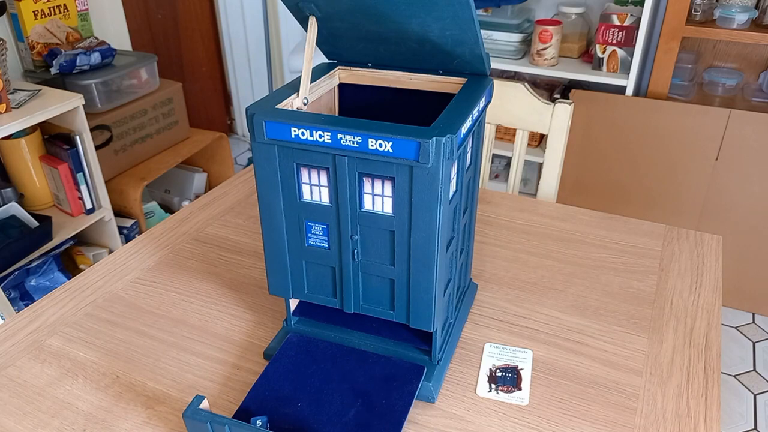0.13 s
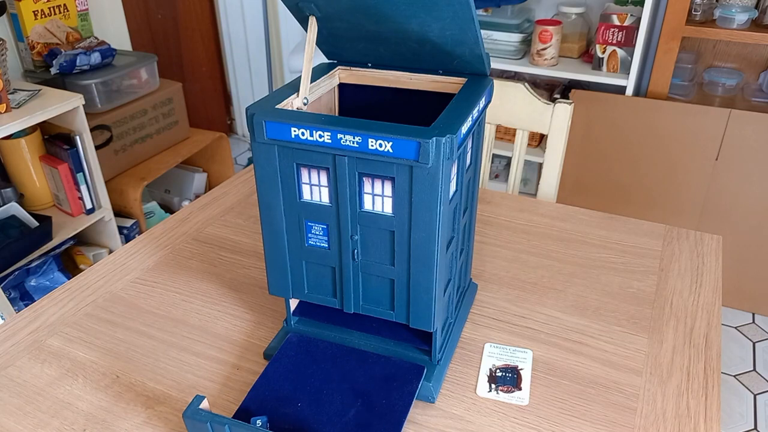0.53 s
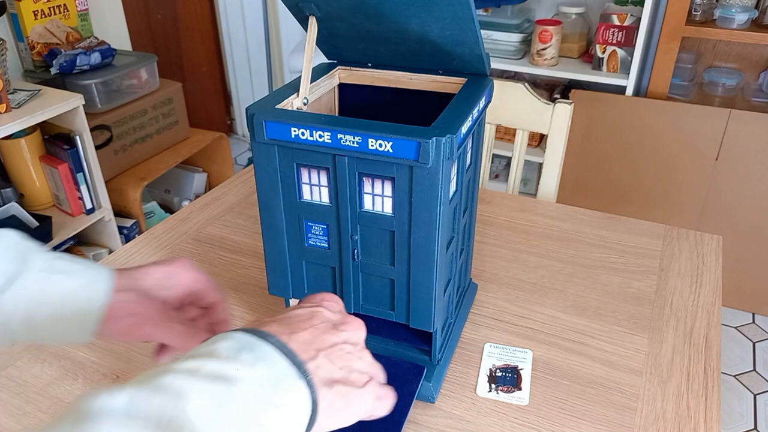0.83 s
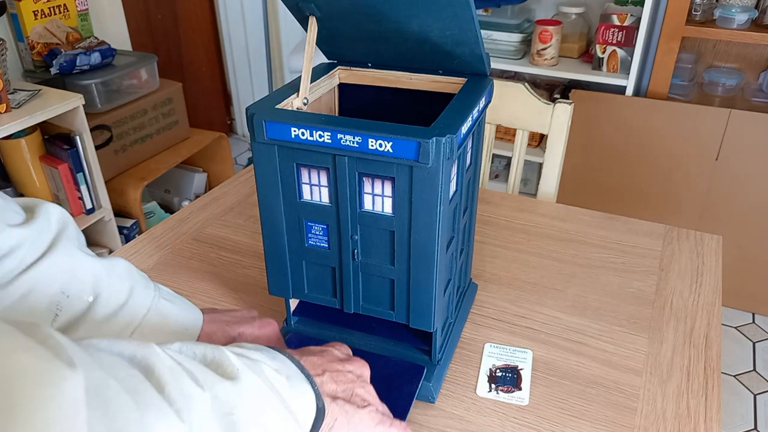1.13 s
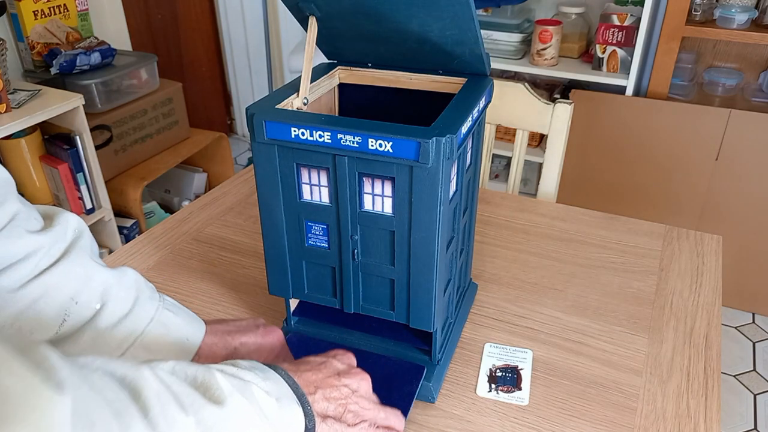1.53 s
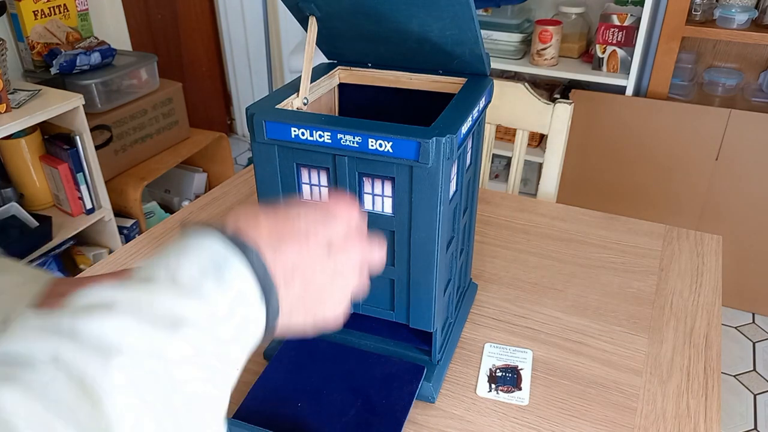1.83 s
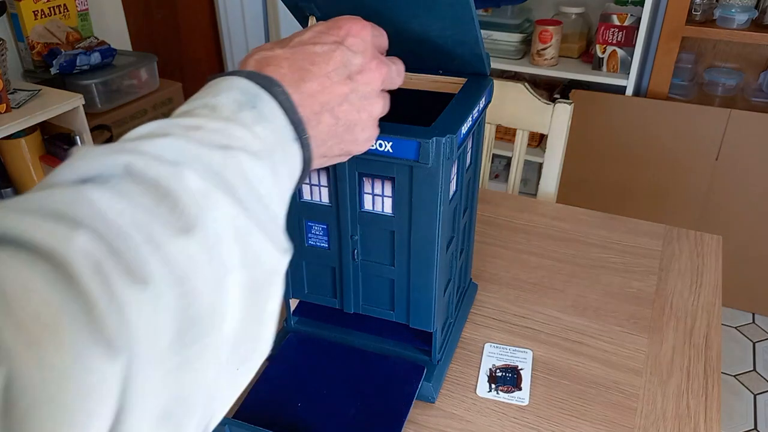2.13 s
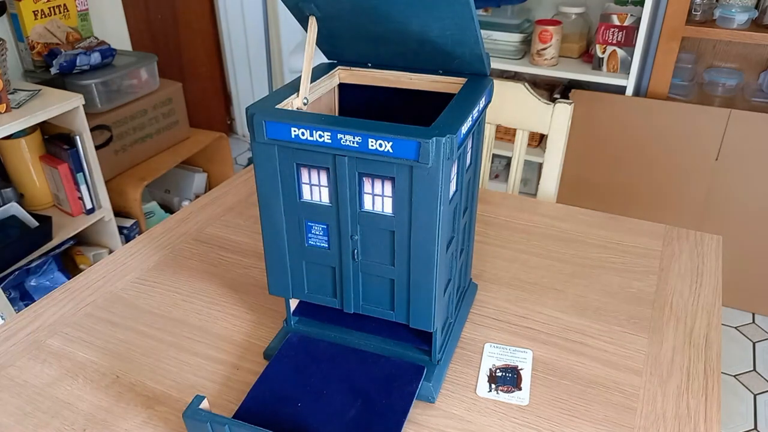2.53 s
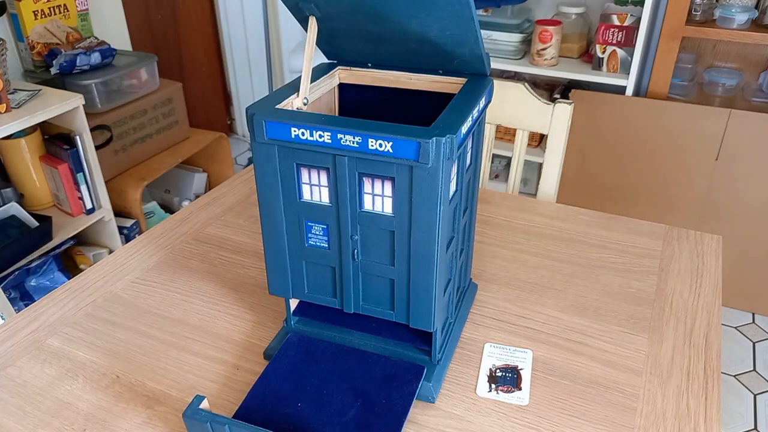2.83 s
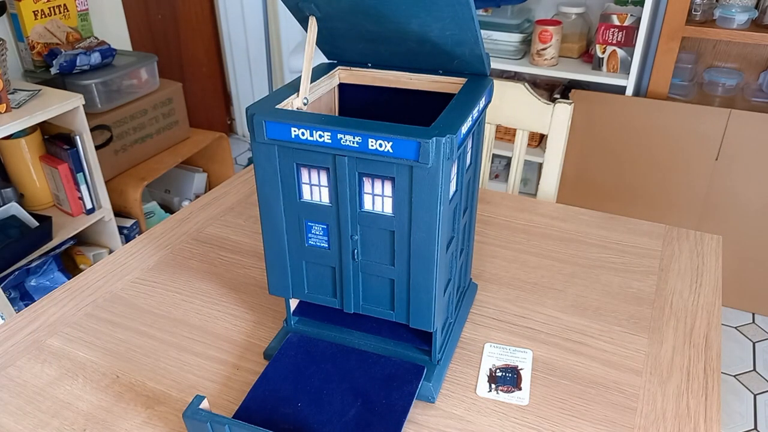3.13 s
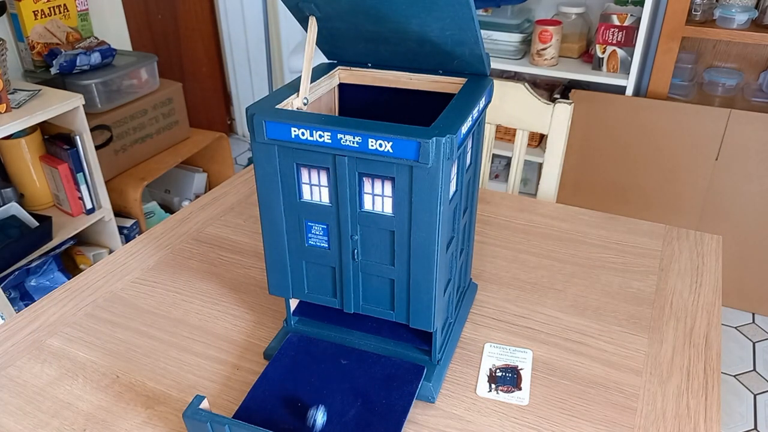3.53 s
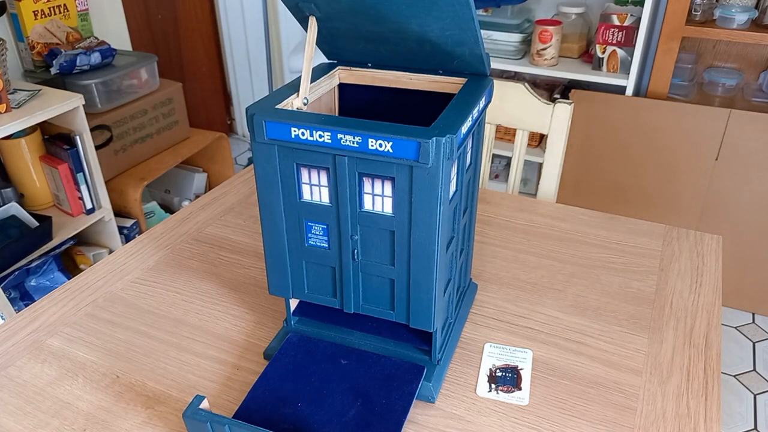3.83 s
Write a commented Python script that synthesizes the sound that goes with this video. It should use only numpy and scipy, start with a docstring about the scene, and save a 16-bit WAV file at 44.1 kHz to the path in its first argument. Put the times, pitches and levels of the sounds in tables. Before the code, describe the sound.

A die clatters down a wooden dice tower and lands softly on a felt tray.

```python
"""A quiet room hisses, with faint far-off whistles, low hoots and the rustle of a sleeve.
After about two seconds a die drops into a wooden dice tower on a table. It knocks and rattles on the
top baffle, a side wall, the middle baffle and the ramp, rolls over the sill and bounces softly on a
felt-lined tray. Each blow makes a short clack and rings the modes of the board it strikes;
the table thumps faintly and the small room reverberates."""
import sys
import numpy as np
from scipy import signal
from scipy.fft import rfft, irfft
from scipy.io import wavfile

SR = 44100
rng = np.random.default_rng(int(sys.argv[2]) if len(sys.argv) > 2 else 0)


def waveform_to_disk(signal):
    """Save audio, clipped to [-1, 1], as 16-bit WAV at the path in sys.argv[1]."""
    frames = np.transpose(np.atleast_2d(signal))
    scaled = np.clip(frames, -1, 1) * 32767
    samples = np.round(scaled).astype(np.int16)
    wavfile.write(sys.argv[1], SR, samples)


N = 176400
TIME = np.arange(N) / SR

# Background spectrum: freq_hz, relative_density_db
HISS_SPECTRUM = [(15, -44.5), (25, -25), (64, 2.5), (206, -8.5), (293, -8.5), (416, -15), (624, -14.5),
                 (1700, -12), (2050, -13), (3160, -0.5), (4400, -8), (5000, -20.5), (16000, -40.5)]
# Background drift: time_s, level_db (before HISS_TRIM_DB)
HISS_DRIFT = [(0.0, -63.5), (2.87, -64), (4.0, -62.5)]
# Far whistles: start_s, release_s, level_db, first_hz, final_hz, blur_hz
WHISTLES = [(-.1, .2, -64, 2900, 2897, 9.2), (.63, 0.854, -69, 5700, 5465, 73),
            (1.12, 1.3, -70, 4260, 4220, 17), (1.41, 1.52, -66, 4150, 2950, 90),
            (1.75, 1.86, -70.5, 4750, 4050, 80)]
# Low hoots: start_s, end_s, level_db, first_hz, last_hz
HOOTS = [(0.107, 0.457, -78.5, 349, 355), (0.958, 1.446, -74.5, 316, 347.6)]
# Friction of the sleeve, and of the die on a baffle: start_s, end_s, level_db, centre_hz, half_width_oct
SLEEVE_RUSTLES = [(-.15, 0.466, -66.5, 4560, 0.13), (-.15, 0.926, -68.5, 2060, 0.17),
                  (0.58, 1.29, -67, 3650, 0.088), (0.683, 1.05, -76, 10200, 0.29),
                  (1.21, 1.602, -73, 6300, 0.1), (1.672, 2.49, -62, 4160, 0.26),
                  (1.852, 2.49, -58, 6150, 0.062)]
DIE_SLIDE = (2.95, 3.22, -53, 3400, 1.05)
# Left-right likeness: freq_hz, correlation
AIR_CORRELATION = [(60, 0.27), (500, .5), (2000, 0.067), (8000, 0.035)]
ROOM_CORRELATION = [(200, 1), (600, 0.38), (1500, 0.27), (5000, 0.24)]
CLACK_CORRELATION = [(100, 0.13), (500, .92), (1200, -0.8), (2500, 0.07), (5000, -0.63), (15000, 0.14)]
# Spectra of reverberation and clacks: freq_hz, relative_db
ROOM_SPECTRUM = [(200, -0.5), (800, -5), (2000, -5), (4000, -3.5), (8000, -3.5), (15000, -3.5)]
WOOD_CLACK = [(250, -21), (650, -1.5), (1200, -6), (2200, -6.5), (3500, -16), (5500, -26.5), (9000, -27),
              (15000, -27)]
FELT_CLACK = [(250, -5.5), (700, 2.5), (1300, 0), (2200, -9), (15000, -46.5)]
# Their decay: freq_hz, t60_s
ROOM_DECAY = [(250, 0.44), (800, 0.34), (3000, 0.44), (7000, 0.36), (15000, .44)]
CLACK_DECAY = [(250, 0.09), (1000, 0.056), (2500, 0.046), (6000, 0.033), (15000, 0.045)]
# Modes of the table under the tower: pitch_hz, relative_db, t60_s
TABLE_MODES = [(72, -50, .1), (105, -45, 0.043), (122, -47.5, 0.093)]
# Board modes: pitch_hz, relative_db
MOUTH_MODES = [(253, -26.5), (392, -14.5), (1170, -30), (1245, -28.5)]
TOP_MODES = [(261, -13.5), (346, -17), (438, -17.5), (483, -21.5), (647, -24), (722, -12.5), (763, -26),
             (827, -13), (868, -38.5), (1050, -26), (1740, -29), (1772, -26.5), (2818, -35), (3480, -23.5)]
WALL_MODES = [(262, -22.5), (344, -19), (390, -22.5), (440, -22.5), (645, -22), (680, -24.5), (722, -22),
              (760, -19.5), (857, -24.5), (1771, -26), (2228, -20), (2270, -23.5), (2350, -32), (4100, -36)]
MIDDLE_MODES = [(257, -21.5), (311, -21), (480, -25), (511, -16.5), (561, -15), (608, -21), (636, -20.5),
                (1130, -18.5), (1168, -22.5), (1213, -16.5), (1243, -19.5), (1758, -28), (2186, -25.5),
                (2309, -25.5), (2335, -19.5)]
RAMP_MODES = [(262, -12.5), (317, -10), (402, -16.5), (484, -18.5), (510, -14.5), (559, -17), (647, -19.5),
              (676, -24.5), (889, -17), (921, -27.5), (1962, -19.5), (1993, -24), (2121, -25),
              (3007, -20.5)]
SILL_MODES = [(327, -25), (426, -15), (511, -13), (560, -22.5), (885, -17.5), (907, -21.5), (1500, -16),
              (1702, -25)]
TRAY_MODES = [(249, -24), (484, -33.5), (684.5, -19)]
# Blows of the die: start_s, strength_db, contact_cutoff_hz (low for a soft touch)
MOUTH_HITS = [(2.2605, 0, 1523), (2.3405, 0.0095, 558)]
TOP_HITS = [(2.3903, 0.5, 11260), (2.405, -15.5, 1770), (2.416, -10, 5000), (2.426, -6.5, 2024)]
WALL_HITS = [(2.5268, 2.5, 7000), (2.556, -10, 3000), (2.5788, -2.5, 5500), (2.6265, -20.5, 3500),
             (2.654, -23, 3000), (2.6815, -7, 1200), (2.7112, -4.5, 3510), (2.734, -9, 1200)]
MIDDLE_HITS = [(2.773, 2.5, 8670), (2.805, -17.5, 4500), (2.836, -7.5, 2800), (2.8708, -10, 5000)]
RAMP_HITS = [(3.094, -15.5, 490), (3.16, 2.5, 7900)]
SILL_HITS = [(3.314, -16.5, 2500), (3.347, -10.5, 3520), (3.364, -16.5, 1100)]
TRAY_HITS = [(3.4805, -1, 2200), (3.555, -1, 300), (3.608, -11, 220), (3.74, -19.5, 317)]
# Rolls of the die: start_s, end_s, strength_db, contact_cutoff_hz
WALL_ROLLS = [(2.46, 2.76, -22, 750)]
MIDDLE_ROLLS = [(2.79, 2.87, -29, 1392), (2.96, 3.09, -28, 578)]
RAMP_ROLLS = [(3.1, 3.14, -24, 507)]
SILL_ROLLS = [(3.23, 3.35, -21, 914)]

HISS_TRIM_DB = -0.5
MODE_SPREAD_DB, MODE_PAN_DB, LEFT_DB = 4, 1.74, 0.56
TREBLE_DAMPING_HZ = 2200  # joints damp high modes: decay is twice as fast here
# After a light blow the die lingers, damping and detuning the board.
RING_DB_PER_DB, LIGHT_BLOW_DB, DETUNE_RATIO = 0.25, -10, .009


def from_db(db):
    """Decibels to gain."""
    return 10 ** (np.asarray(db) / 20)


def at_hz(points, hz):
    """Table lookup on a log-frequency axis."""
    points_hz, values = np.transpose(points)
    return np.interp(np.log(hz), np.log(points_hz), values)


def butter(x, hz, kind, order=2):
    """Causal Butterworth filter."""
    sos = signal.butter(order, np.clip(hz, 10, .45 * SR), kind, fs=SR, output="sos")
    return signal.sosfilt(sos, x)


def add(out, start_s, sound):
    """Mix a sound in at start_s."""
    i = int(start_s * SR)
    out[:, i:i + sound.shape[1]] += sound[:, :N - i]


def stereo(pair, correlation):
    """Two independent signals to correlated left and right."""
    correlation = np.clip(correlation, -.99, .99)
    mid = np.sqrt((1 + correlation) / 2) * pair[0]
    side = np.sqrt((1 - correlation) / 2) * pair[1]
    return np.array([mid + side, mid - side])


def steady_noise(gain_at):
    """Stereo noise, rms 1, shaped by gain_at(hz)."""
    hz = np.maximum(np.arange(N // 2 + 1) * SR / N, 1)
    white = stereo(rfft(rng.standard_normal((2, N))), at_hz(AIR_CORRELATION, hz))
    noise = irfft(white * gain_at(hz), N)
    return noise / np.std(noise)


def dying_noise(spectrum, decay, correlation, samples):
    """Dense modes as half-octave noise bands, each with its own energy and decay."""
    t, out = TIME[:samples], 0
    edges_hz = np.geomspace(125, 16000, 15)
    for low_hz, high_hz in zip(edges_hz, edges_hz[1:]):
        hz = np.sqrt(low_hz * high_hz)
        burst = rng.standard_normal((2, samples)) * from_db(-60 * t / at_hz(decay, hz))
        band = butter(burst, [low_hz, high_hz], "band")
        band *= np.sqrt(2 * (high_hz - low_hz) / SR / np.sum(band ** 2, axis=1, keepdims=True))
        out += from_db(at_hz(spectrum, hz)) * stereo(band, at_hz(correlation, hz))
    return out


def swell(start_s, end_s, fade_s=.13):
    """Smooth fade in, hold, fade out."""
    ramp = np.clip(np.minimum(TIME - start_s, end_s - TIME) / fade_s, 0, 1)
    return np.sin(np.pi / 2 * ramp) ** 2


def swish(start_s, end_s, level_db, centre_hz, half_width_oct):
    """Friction: a noise band that swells and fades."""
    band = steady_noise(lambda hz: 1 / (1 + (np.log2(hz / centre_hz) / half_width_oct) ** 2))
    return from_db(level_db) * swell(start_s, end_s) * band


def hiss():
    """Room background: faint rumble and hiss."""
    level_db = np.interp(TIME, *np.transpose(HISS_DRIFT)) + HISS_TRIM_DB
    return from_db(level_db) * steady_noise(lambda hz: from_db(at_hz(HISS_SPECTRUM, hz)))


def hoots():
    """Very faint low gliding tones, perhaps a dove outside."""
    out = 0
    for start_s, end_s, level_db, first_hz, last_hz in HOOTS:
        pitch_hz = np.interp(TIME, [start_s, end_s], [first_hz, last_hz])
        out += from_db(level_db) * swell(start_s, end_s) * np.sin(2 * np.pi * np.cumsum(pitch_hz) / SR)
    return out


def whistles(attack_s=.048, slide_s=.05, t60_s=.9):
    """Thin far whistles, perhaps birds: each slides down to its note, holds and dies away."""
    out = 0
    for start_s, release_s, level_db, first_hz, final_hz, blur_hz in WHISTLES:
        age_s = np.maximum(TIME - start_s, 0)
        pitch_hz = final_hz + (first_hz - final_hz) * np.exp(-age_s / slide_s)
        phase = 2 * np.pi * np.cumsum(pitch_hz) / SR
        decay_db = 60 * np.maximum(TIME - release_s, 0) / t60_s
        envelope = np.minimum(age_s / attack_s, 1) * from_db(level_db - decay_db)
        blur = signal.hilbert(steady_noise(lambda hz: 1 / (1 + (hz / blur_hz) ** 2)))
        out += envelope * np.real(blur * np.exp(1j * phase))
    return out


def sleeve():
    """Faint swishes of rubbing cloth."""
    return sum(swish(*rustle) for rustle in SLEEVE_RUSTLES)


def room(x, onset_s=.013):
    """Small-room reverberation, swelling as the first reflections arrive."""
    tail = dying_noise(ROOM_SPECTRUM, ROOM_DECAY, ROOM_CORRELATION, samples=SR * 3 // 4)
    tail *= np.minimum(TIME[:tail.shape[1]] / onset_s, 1) ** 2
    return signal.fftconvolve(x, tail, axes=1)[:, :N]


def table_thumps():
    """Blows on wood excite the table's deep modes."""
    t, out = TIME[:SR // 3], np.zeros((2, N))
    modes = sum(from_db(db - 60 * t / t60_s) * np.sin(2 * np.pi * hz * t)
                for hz, db, t60_s in TABLE_MODES)
    thump = butter(modes, 45, "high")[None]
    for start_s, strength_db, _ in TOP_HITS + WALL_HITS + MIDDLE_HITS + RAMP_HITS + SILL_HITS:
        add(out, start_s, from_db(strength_db) * thump)
    return out


def rolling(rolls, bumps_per_s=100, max_bumps=64):
    """The die bumps over its edges at uneven intervals; returns hits."""
    bumps = []
    for start_s, end_s, strength_db, cutoff_hz in rolls:
        jitter = rng.uniform(-.4, .4, max_bumps)
        times_s = start_s + (np.arange(max_bumps) + jitter) / bumps_per_s
        strengths_db = rng.normal(strength_db, 2, max_bumps)
        bumps += [(s, db, cutoff_hz) for s, db in zip(times_s, strengths_db) if s < end_s]
    return bumps


def board(hits, modes, clack_spectrum, ring_db, clack_db, bass_t60_s):
    """Each blow excites a random mix of modes and a short clack; soft contact dulls both."""
    t, out = TIME[:SR // 3], np.zeros((2, N))
    mode_hz, mode_db = np.transpose(modes)[:, :, None]
    t60_s = bass_t60_s / (1 + mode_hz / TREBLE_DAMPING_HZ)
    envelopes = from_db(mode_db + ring_db - 60 * t / t60_s)
    pan_db = MODE_PAN_DB * rng.standard_normal(len(modes)) * np.array([[1], [-1]])
    clacks = [dying_noise(clack_spectrum, CLACK_DECAY, CLACK_CORRELATION, SR // 8) for _ in range(4)]
    mix, tuning = rng.standard_normal((2, 160, len(modes)))  # up to 160 blows
    for k, (start_s, strength_db, cutoff_hz) in enumerate(hits):
        lightness = np.clip(strength_db / LIGHT_BLOW_DB, 0, 1)
        detune = DETUNE_RATIO * lightness * tuning[k][:, None]
        rings = envelopes * np.sin(np.float32(2 * np.pi * mode_hz * (1 + detune) * t))
        blow = from_db(pan_db + MODE_SPREAD_DB * mix[k] + RING_DB_PER_DB * strength_db) @ rings
        add(blow, 0, from_db(clack_db) * clacks[k % len(clacks)])
        add(out, start_s, from_db(strength_db) * butter(blow, cutoff_hz, "low"))
    return out


def tower(low_cut_hz=267):
    """The die strikes seven boards on its way down; small boards radiate little bass."""
    mouth = board(MOUTH_HITS, MOUTH_MODES, FELT_CLACK, ring_db=-8.5, clack_db=-2, bass_t60_s=.34)
    top = board(TOP_HITS, TOP_MODES, WOOD_CLACK, ring_db=-1.5, clack_db=29, bass_t60_s=.31)
    wall = board(WALL_HITS + rolling(WALL_ROLLS), WALL_MODES, WOOD_CLACK,
                 ring_db=-1, clack_db=20.5, bass_t60_s=.18)
    middle = board(MIDDLE_HITS + rolling(MIDDLE_ROLLS), MIDDLE_MODES, WOOD_CLACK,
                   ring_db=-4.5, clack_db=26, bass_t60_s=.23)
    ramp = board(RAMP_HITS + rolling(RAMP_ROLLS), RAMP_MODES, WOOD_CLACK,
                 ring_db=-2, clack_db=25.5, bass_t60_s=.19)
    sill = board(SILL_HITS + rolling(SILL_ROLLS), SILL_MODES, WOOD_CLACK,
                 ring_db=2.5, clack_db=23.5, bass_t60_s=.15)
    tray = board(TRAY_HITS, TRAY_MODES, FELT_CLACK, ring_db=-2, clack_db=5, bass_t60_s=.12)
    return butter(mouth + top + wall + middle + ramp + sill + tray, low_cut_hz, "high", order=8)


def scene():
    """The tower, slightly left, in its room."""
    die = (tower() + table_thumps()) * from_db([[LEFT_DB], [-LEFT_DB]])
    return die + room(die) + swish(*DIE_SLIDE) + hiss() + sleeve() + whistles() + hoots()


def record(dry):
    """Soft peak limit, then a steep low-pass."""
    stop_hz, stop_db = 16600, 70
    rounded = dry / (1 + dry ** 6) ** (1 / 6)
    return signal.sosfilt(signal.cheby2(14, stop_db, stop_hz, fs=SR, output="sos"), rounded)


dry = scene()
out = record(dry)
waveform_to_disk(out)
```